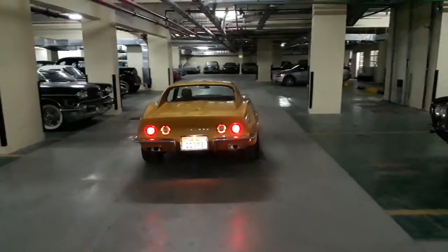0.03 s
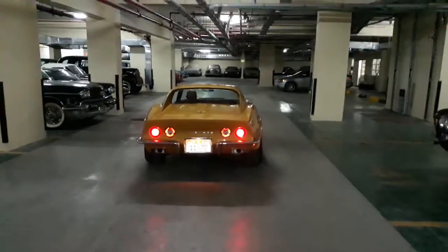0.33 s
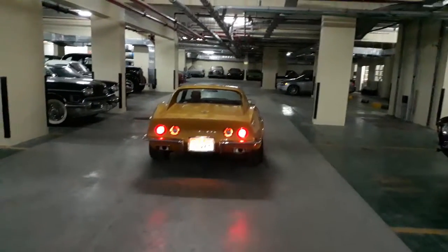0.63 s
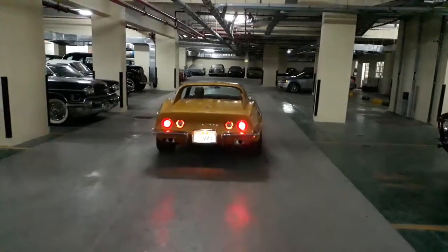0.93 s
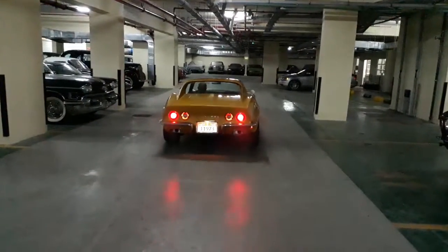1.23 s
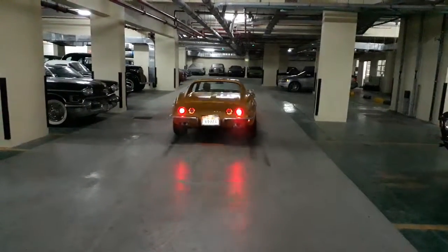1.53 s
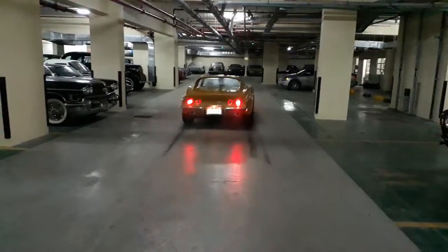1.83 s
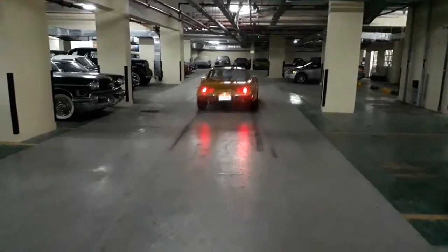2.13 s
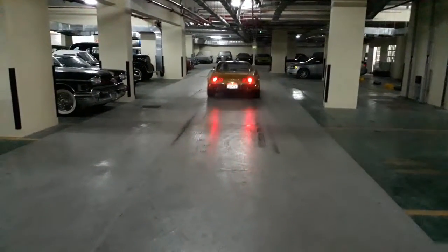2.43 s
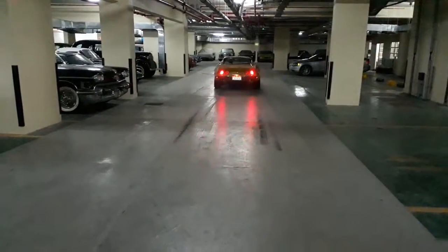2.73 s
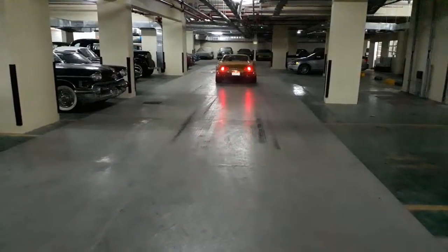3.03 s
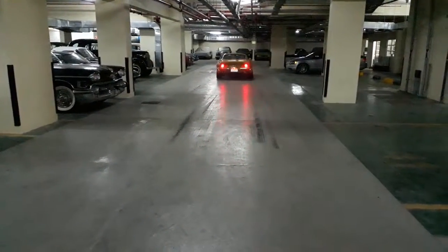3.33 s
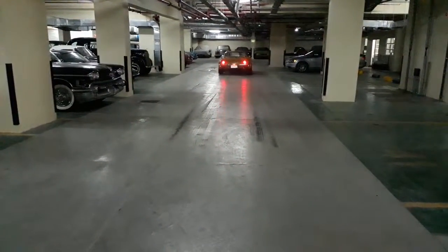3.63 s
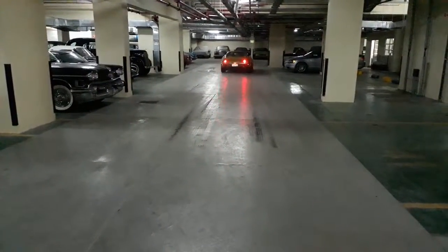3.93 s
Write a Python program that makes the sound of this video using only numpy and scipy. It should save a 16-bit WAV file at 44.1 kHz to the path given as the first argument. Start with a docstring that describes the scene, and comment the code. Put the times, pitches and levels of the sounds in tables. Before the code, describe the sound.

In a reverberant parking garage, a nearby car revs from idle and launches with a long tyre screech. The engine drops back and the screech dies away as the car moves off from the microphone, with ventilation humming underneath.

```python
"""A concrete parking garage: a V8 car idles, revs, spins its rear tyres on the smooth floor and pulls away.
Uneven firings ring the exhaust pipe over a rush of gas and fan. Each tyre sticks and slips at a wavering
pitch; the hall smears the squeal into a band and takes over with distance. The recorder's gain control
ducks engine and ventilation hum under the squeal and slowly lets them back."""
import sys
import numpy as np
from scipy import signal
from scipy.fft import rfft, irfft
from scipy.io import wavfile
from scipy.ndimage import uniform_filter1d, minimum_filter1d

SR = 44100
rng = np.random.default_rng(int(sys.argv[2]) if len(sys.argv) > 2 else 0)


def waveform_to_disk(signal):
    """Save audio, clipped to [-1, 1], as 16-bit WAV at the path in sys.argv[1]."""
    frames = np.transpose(np.atleast_2d(signal))
    scaled = np.clip(frames, -1, 1) * 32767
    samples = np.round(scaled).astype(np.int16)
    wavfile.write(sys.argv[1], SR, samples)


N = 176400
T = np.arange(N) / SR

# wheelspin: t/s, squeal f/Hz, level/dB, overtone lift/dB, scrub relative to the squeal/dB
WHEELSPIN = [(.66, 1482, -40, -16, -30), (.695, 1469, -9.5, -12, -24), (.755, 1355, 1, -7.5, -35),
             (.87, 1278, 5, -6, -28), (1.03, 1250, 4.5, -1, -21.5), (1.25, 1207, 6, 0.5, -12.5),
             (1.6, 1166, 7.5, -0.5, -10.5), (2.03, 1189, 9, 2, -17), (2.2, 1185, 7.5, -3, -15),
             (2.5, 1189, -1, -2, -13.5), (2.75, 1186, -5.5, -5, -9.5), (2.86, 1183, -4, -3, -11.5),
             (3.1, 1181, -7, -4, -14), (3.32, 1181, -6.5, -4, -10), (3.47, 1181, -12.5, -2.5, -7.5),
             (3.7, 1175, -16.5, -6.5, -7), (4, 1176, -23, -5, -8)]


def undb(db):
    """Decibels to gain."""
    return np.exp(np.asarray(db) * np.log(10) / 20)


def unit(x):
    """Scale to rms 1."""
    return x / np.sqrt(np.mean(x ** 2))


def curves(table):
    """One envelope per column of a timed table, in straight ramps."""
    rows = np.array(table, float)
    return [np.interp(T, rows[:, 0], column) for column in rows.T[1:]]


def on_log_axis(hz, points):
    """Read (f/Hz, value) points on a log-frequency axis."""
    rows = np.array(points, float)
    return np.interp(np.log(hz + 1), np.log(rows[:, 0]), rows[:, 1])


def noise(spectrum):
    """Noise of rms 1, coloured by (f/Hz, level/dB) points."""
    gains = undb(on_log_axis(np.arange(N + 1) * SR / (2 * N), spectrum))
    return unit(irfft(rfft(rng.standard_normal(N), 2 * N) * gains)[:N])


def drift(rate):
    """A smooth random modulator of rms 1 with about `rate` new values a second."""
    steps = np.interp(T * rate, np.arange(N // 64), rng.standard_normal(N // 64))
    return unit(uniform_filter1d(steps, int(SR / rate / 2) + 1))


def cycles(hz):
    """Running phase in cycles."""
    return np.cumsum(hz) / SR


def tone(hz, waver, rate):
    """A sine of rms 1 whose pitch wavers by the share `waver`."""
    return np.sqrt(2) * np.sin(2 * np.pi * cycles(hz * (1 + waver * drift(rate))))


def engine():
    """Eight uneven firings a cycle thump the exhaust; gas puffs with each; a belt whines until launch."""
    # the rev: t/s, firing rate/Hz, exhaust level/dB, gas and fan level/dB
    rev = [(0, 44.76, -43, -36.5), (.34, 46.35, -39, -44), (.42, 52.55, -31, -28), (.44, 58.97, -19.5, -22),
           (.555, 68.1, -21, -17), (.595, 73.16, -28, -28), (.625, 79.25, -20, -19),
           (.715, 92.06, -16, -20.5), (.78, 108.1, -19.5, -24), (1.03, 148.5, -10.5, -17.5),
           (1.2, 170.2, -15.5, -13.5), (1.45, 190.3, -10.5, -14.5), (1.65, 206.4, -13, -11),
           (1.86, 188.8, -16.5, -9.5), (2.03, 159.1, -23.5, -15), (2.2, 111.9, -21.5, -35.5),
           (2.8, 82.15, -25, -46.5), (3.4, 63.84, -28.5, -52), (4, 50, -39, -51)]
    # accents of the eight firings: level/dB
    cylinder_db = [3.5, -3, 5.5, -2, -4, -1.5, -3, -2]
    # colour of the gas and fan rush: f/Hz, level/dB
    rush_colour = [(150, -7), (500, 4), (1000, 4), (2000, -1), (3000, 2.5), (4600, -3), (6000, 0.5),
                   (7200, -0.5), (8600, -5), (9500, -13), (10700, -10.5), (15500, -20)]
    jitter, scatter_db, puff_depth, flicker_db = .008, 1.9, .26, .8
    hz, exhaust_db, rush_db = curves(rev)
    phase = cycles(hz * (1 + jitter * drift(40)))
    firings = np.flatnonzero(np.diff(np.floor(phase)))
    scatter = scatter_db * rng.standard_normal(N)[:len(firings)]
    pulses = np.zeros(N)
    pulses[firings] = undb(np.resize(cylinder_db, len(firings)) + scatter)
    exhaust = exhaust_pipe(pulses / np.sqrt(hz)) * undb(exhaust_db)
    launch_s = WHEELSPIN[1][0]
    whine = tone(hz=1454, waver=.022, rate=70) * undb(-35.5) * (T < launch_s)
    puffs = unit(1 + puff_depth * np.cos(2 * np.pi * phase))
    rush = noise(rush_colour) * puffs * undb(rush_db + flicker_db * drift(19.24))
    return exhaust + rush + whine


def exhaust_pipe(pulses):
    """Firings ring the pipe and silencer, which radiate no deep bass."""
    # pipe resonances: f/Hz, width/Hz, level/dB
    modes = [(74.3, 36.5, -4.5), (111.7, 15.3, 0), (138, 27.7, 2), (186.3, 39.3, 1), (404, 114, -12.5),
             (542, 102, -5.5), (710, 200, -18.5)]
    rings = sum((-1) ** k * undb(db) * signal.lfilter(*signal.iirpeak(hz, hz / width, SR), pulses)
                for k, (hz, width, db) in enumerate(modes))
    radiated_band = signal.butter(3, [62, 1390], "bandpass", fs=SR, output="sos")
    return unit(signal.sosfilt(radiated_band, rings))


def ventilation():
    """Fans lay a bed of hum and gently swelling air under the scene."""
    # colour of the moving air: f/Hz, level/dB
    air_colour = [(25, -44), (60, -2), (140, -2), (260, -2.5), (400, -4.5), (700, -9.5), (1300, -10),
                  (1900, -16), (3300, -18), (5000, -26.5), (7500, -25), (9500, -38), (11000, -35),
                  (15500, -40)]
    # fan tones: f/Hz, level/dB, waver/share of pitch
    hum_tones = [(221.8, -31.5, 0.0011), (308, -36.5, .002), (144.8, -41, .025)]
    air_db, swell_db = -30.5, 2.1
    air = noise(air_colour) * undb(air_db + swell_db * drift(6.8))
    return air + sum(undb(db) * tone(hz, waver, rate=15) for hz, db, waver in hum_tones)


def garage(car):
    """Three echo patterns blend as the car moves; the mix gets wetter as it leaves."""
    # the car's path: t/s, distance/m
    path = [(0, 3.6), (.8, 5.3), (2, 9.2), (4, 21)]
    echo_radius_m = 5.67  # the hall is as loud as the direct sound here
    weights = np.array([drift(rate=14) for _ in range(3)])
    wet = sum(weight * echoes(car) for weight in weights) / np.linalg.norm(weights, axis=0)
    direct_gain = echo_radius_m / curves(path)[0]
    return (direct_gain * car + wet) / np.hypot(direct_gain, 1)


def echoes(x):
    """One dense pattern of echoes off concrete, dying fastest in the high treble."""
    # reverb time of the hall: f/Hz, t60/s
    hall_decay = [(100, 1), (1200, 1.39), (4000, 1.77), (12000, 0.32)]
    hz, seconds, cells = signal.stft(rng.standard_normal(N // 2), SR, nperseg=512)
    t60 = on_log_axis(hz, hall_decay)[:, None]
    tail = signal.istft(cells * np.exp(-np.log(1000) * seconds / t60) / np.sqrt(t60), SR)[1]
    return signal.fftconvolve(x, tail / np.sqrt(np.sum(tail ** 2)))[:N]


def tread_squeaks():
    """The loaded tread creeps in thin, short squeaks just before it lets go."""
    # squeaks: centre t/s, length/s, f/Hz, level/dB
    creeps = [(0.484, .07, 2777, -33), (0.623, 0.092, 2830, -24.5)]
    return sum(undb(db) * np.exp(-(2 * (T - at) / length) ** 2) * tone(hz, waver=.018, rate=120)
               for at, length, hz, db in creeps)


def tyre_squeal():
    """Two tyres stick and slip, each with its own waver and chatter, over rubber scrubbing on concrete."""
    # rear tyres: slip start t/s, pitch ratio, waver/share of pitch, level/dB,
    # then harmonics 2, 3 and 4 before the overtone lift, each level/dB
    rear_tyres = [(0.549, 1.009, .034, -2.5, -11, -25.5, -31.5), (.71, .9, .052, -10, 2, -11, -16)]
    slip_rise_s, waver_growth_s = .13, .4  # the pitch roughens as the slip grows
    flutter, chatter_db, overtone_fall_db = .02, 3.5, 6.5
    hz, level_db, lift_db, scrub_db = curves(WHEELSPIN)
    # colour of the scrub: f/Hz, level/dB
    scrub_colour = [(120, -17.5), (330, -4.5), (480, 3), (680, 1.5), (800, 5), (1000, 9), (1600, 1.5),
                    (3200, -9), (5000, -20.5), (7500, -19), (9500, -32), (15000, -40.5)]
    rubber = noise(scrub_colour) * undb(scrub_db)
    for start, ratio, waver, db, *harmonic_db in rear_tyres:
        waver_depth = waver * np.clip((T - start) / waver_growth_s, 0, 1)
        bend = 1 + waver_depth * drift(115) + flutter * drift(240)
        phase = 2 * np.pi * cycles(hz * ratio * bend)
        series_db = np.append(harmonic_db, harmonic_db[-1] - overtone_fall_db * np.array([1, 2]))
        overtones = sum(gain * np.sin(k * phase) for k, gain in enumerate(undb(series_db), start=2))
        squeal = np.sin(phase) + undb(lift_db) * overtones
        slip = np.clip((T - start) / slip_rise_s, 0, 1)
        chatter = unit(undb(chatter_db * drift(130)))
        rubber += np.sqrt(2) * undb(db) * slip * chatter * squeal
    return rubber * undb(level_db) * (T > WHEELSPIN[0][0])


def ticks():
    """Faint, dry clicks of treble close by."""
    # clicks: t/s, level/dB
    hits = [(3.263, -44), (3.274, -35)]
    # their colour: f/Hz, level/dB
    tick_colour = [(2000, -25), (7000, -2), (12000, 0), (15500, -5)]
    decay_s = .002
    bursts = sum(undb(db) * (T >= at) * np.exp(-np.abs(T - at) / decay_s) for at, db in hits)
    return bursts * noise(tick_colour)


def scene():
    """The car in the hall, over the ventilation, in mono."""
    car = engine() + tread_squeaks() + tyre_squeal()
    return (garage(car) + ventilation() + ticks())[None]


def record(dry):
    """Gain control dives on loud sound, holds, then recovers slowly; peaks are rounded, the top is cut."""
    threshold_db, detect_s, hold_s, release_db_per_s, top_hz = -8.5, .021, .48, 11, 15800
    pole = np.exp(-1 / (detect_s * SR))
    power = signal.lfilter([1 - pole], [1, -pole], dry[0] ** 2)
    over_db = np.maximum(10 * np.log10(power + 1e-12) - threshold_db, 0)
    hold = 2 * int(hold_s * SR / 2) + 1
    held_db = -minimum_filter1d(-over_db, hold, origin=hold // 2, mode="nearest")
    duck_db = np.maximum.accumulate(held_db + release_db_per_s * T) - release_db_per_s * T
    ducked = dry * undb(-duck_db)
    rounded = ducked / (1 + ducked ** 8) ** (1 / 8)
    return signal.sosfilt(signal.ellip(10, .2, 80, top_hz, fs=SR, output="sos"), rounded)


dry = scene()
out = record(dry)
waveform_to_disk(out)
```